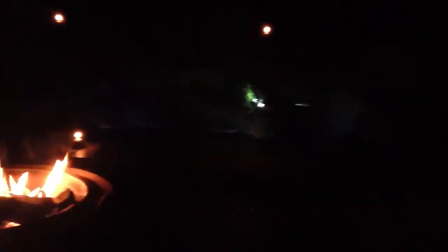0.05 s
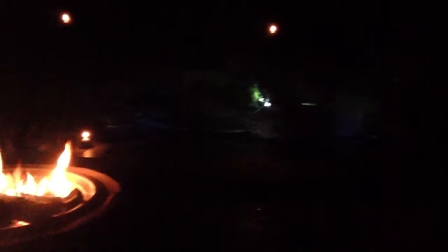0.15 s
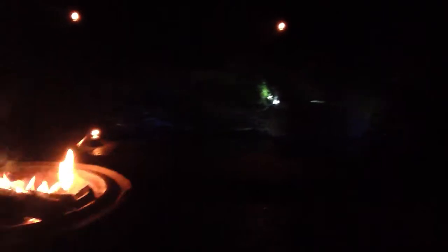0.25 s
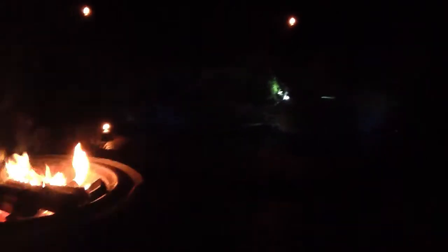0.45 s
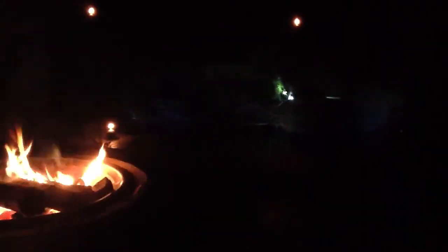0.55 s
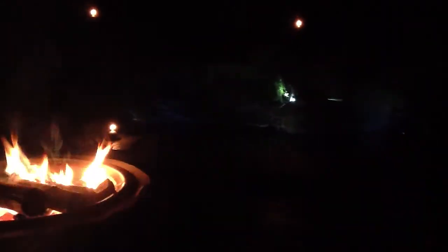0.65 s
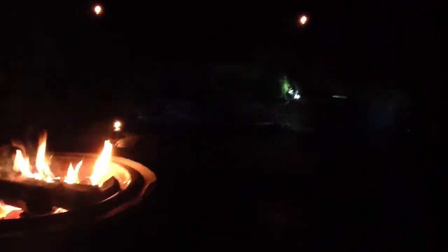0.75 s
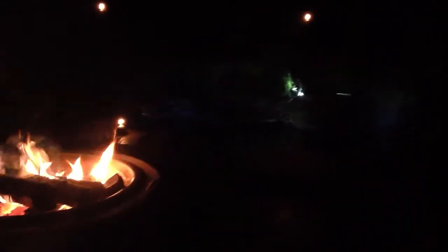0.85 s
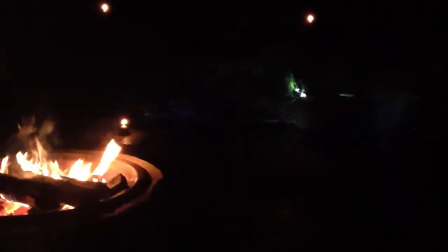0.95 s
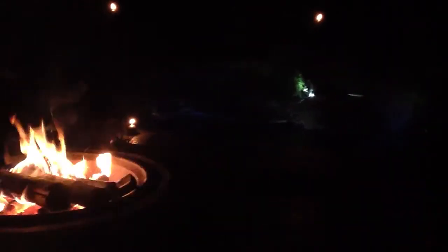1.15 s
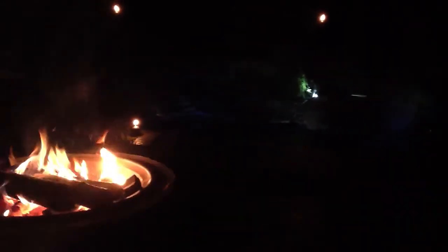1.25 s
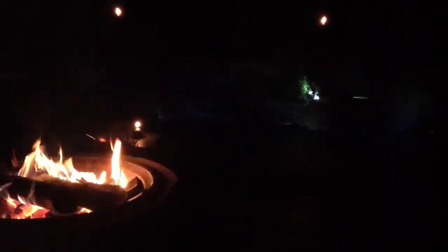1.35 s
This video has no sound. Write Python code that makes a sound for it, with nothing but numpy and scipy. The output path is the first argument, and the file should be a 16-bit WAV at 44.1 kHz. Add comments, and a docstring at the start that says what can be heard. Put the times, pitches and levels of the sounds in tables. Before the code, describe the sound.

Two tree frogs trill over each other at night, with distant frogs and faint fire crackle.

```python
"""Two tree frogs trill over each other at night, each a train of rising chirps that slows as it goes.
Farther off, a toad's pulses ring its throat into a buzz, other frogs croak low, and distant toads
and insects merge into pulsing bands of noise. A small fire ticks faintly and a distant motor hums
under a steady hiss. Ground and trees return short echoes."""
import sys
import numpy as np
from scipy import signal
from scipy.fft import rfft, irfft, next_fast_len
from scipy.io import wavfile
from scipy.ndimage import uniform_filter1d, map_coordinates

SR = 44100
rng = np.random.default_rng(int(sys.argv[2]) if len(sys.argv) > 2 else 0)


def wav_out(sig):
    """Save sig, one row per channel (or a flat mono array), as 16-bit PCM at SR to the path in sys.argv[1]."""
    wavfile.write(sys.argv[1], SR, np.round(np.clip(np.atleast_2d(sig).T, -1, 1) * 32767).astype(np.int16))


N = 61739
TIME = np.arange(N) / SR

def amp(db):
    """Decibels to amplitude ratio."""
    return 10 ** (np.asarray(db) / 20)

def unit(x):
    """Normalisation to rms 1."""
    return x / np.sqrt(np.mean(x ** 2) + 1e-20)

def along(points, hz):
    """Interpolation on a log frequency axis."""
    f, v = np.transpose(points)
    return np.interp(np.log(hz + 1), np.log(f + 1), v)

def read(rows, t):
    """Linear interpolation of each column at times t."""
    s, *cols = np.transpose(rows)
    return [np.interp(t, s, c) for c in cols]

def wobble(rate):
    """Smooth random modulation, rate knots a second."""
    knots = rng.standard_normal(int(N * rate / SR) + 4)
    return map_coordinates(knots, [TIME * rate])

def filtered(x, response):
    """Linear filtering: the spectrum times a frequency response."""
    m = next_fast_len(N + SR // 2)
    return irfft(rfft(x, m) * response(np.fft.rfftfreq(m, 1 / SR)), m)[:N]

def coloured(x, spectrum):
    """Spectral shaping by a table of gains."""
    return filtered(x, lambda hz: amp(along(spectrum, hz)))

def bell(u, rise, fall):
    """Gaussian with its own width on each side of u = 0."""
    return np.exp(-.5 * (u / np.where(u < 0, rise, fall)) ** 2)

# Motor partials. Each row: frequency in Hz, rms level in dB.
MOTOR_PARTIALS = [(112.2, -66), (157.1, -68.5), (201.9, -68), (246.7, -74)]
def motor():
    """Superposition: fixed sinusoids, each drifting in level, sum to a hum."""
    return sum(amp(db + 1.9 * wobble(5.6)) * np.sqrt(2) * np.sin(2 * np.pi * (hz * TIME + rng.random()))
               for hz, db in MOTOR_PARTIALS)

# Hiss spectrum. Each row: frequency in Hz, relative level in dB.
AIR_SPECTRUM = [(25, -23), (50, -23), (85, -11), (130, -3.5), (260, -1), (380, -10.5), (600, 8),
                (780, -2.5), (920, 3.5), (1150, 4), (1400, -3.5), (1800, 11), (2200, -3.5), (2450, 3.5),
                (2700, 2), (3400, 1), (4800, -1.5), (9000, -3.5), (15000, -6.5)]
def night_air(rms_db=-44.5, flicker_db=1.73, patchy_db=1.5):
    """Modulated noise: the hiss flickers in small patches of time and frequency."""
    noise = rng.standard_normal(N) * amp(flicker_db * wobble(450))
    cells = signal.stft(noise, nperseg=256)[2]
    patches = uniform_filter1d(rng.standard_normal(cells.shape), size=14, axis=0)
    patches = unit(uniform_filter1d(patches, size=6, axis=1))
    hiss = signal.istft(cells * amp(patchy_db * patches), nperseg=256)[1][:N]
    return amp(rms_db) * unit(coloured(hiss, AIR_SPECTRUM))

# The toad's trill. Each row: time in seconds, pulses per second, throat resonance in Hz, level in dB.
TOAD_TRILL = [(0, 110, 1580, -59), (.08, 120, 1770, -54), (.16, 124.5, 1920, -47.5),
              (.28, 127.6, 2003, -42), (.5, 125.7, 1956, -46.5), (.7, 123.4, 1960, -43.5),
              (.9, 121.4, 1910, -41), (1.15, 120.3, 1888, -45), (1.4, 119.2, 1895, -42.5)]
def toad(width_s=.002, rough_db=1.2):
    """Pulsed resonance: each pulse rings the throat briefly; the trill climbs, then sags."""
    rate, hz, db = read(TOAD_TRILL, TIME)
    from_peak_s = (np.cumsum(rate) / SR % 1 - .5) / rate
    rings = bell(from_peak_s, width_s, width_s) * np.cos(2 * np.pi * hz * from_peak_s)
    return amp(db + rough_db * wobble(70)) * unit(rings)

# Swell of the far toads. Each row: time in seconds, level in dB.
FAR_TOAD_LEVELS = [(0, -70), (.1, -66), (.2, -49.5), (.5, -53), (1.0, -48), (1.4, -50.5)]
def chorus(centre_hz, width_hz, pulse_hz, db):
    """Amplitude modulation: far callers merge into a noise band that pulses unevenly."""
    phase = 2 * np.pi * np.cumsum(pulse_hz * (1 + .0983 * wobble(15))) / SR
    gain = amp(db + wobble(5.7))
    band = filtered(rng.standard_normal(N), lambda hz: bell(hz - centre_hz, width_hz, width_hz))
    return gain * unit(band * (1 + np.cos(phase)))

# Far croaks. Each row: peak time in seconds, pitch in Hz, length in seconds, level in dB.
CROAK_NOTES = [(0.014, 616, 0.03, -45.5), (0.087, 660, 0.032, -44), (0.138, 560, 0.02, -44.5),
               (0.199, 629, 0.036, -50.5), (0.244, 610, 0.021, -44), (0.314, 625, 0.046, -45),
               (0.428, 645, 0.03, -41.5), (0.591, 530, 0.017, -42.5), (0.601, 596, 0.023, -48),
               (0.952, 467.4, .05, -57), (1.058, 627.5, 0.073, -45.5), (1.161, 530, 0.02, -47),
               (1.383, 604.7, 0.052, -45.5)]
def far_croaks(waver=.0274):
    """Frequency jitter roughens low notes whose overtones are lost to distance."""
    out = np.zeros(N)
    for s, hz, length, db in CROAK_NOTES:
        phase = 2 * np.pi * np.cumsum(hz * (1 + waver * wobble(200))) / SR
        out += amp(db) * bell(TIME - s, length / 4, length / 3) * np.sin(phase)
    return out

# Fire pops. Each row: start in seconds, level in dB before filtering.
FIRE_POPS = [(.038, -28.5), (0.059, -39), (.462, -27), (.54, -34), (.627, -27.5), (.632, -31),
             (0.913, -32.5), (.946, -30.5), (.973, -35), (1.226, -31)]
# Crackle filter. Each row: frequency in Hz, gain in dB.
FIRE_SPECTRUM = [(30, -50), (200, -16), (500, -2), (1500, 2), (3500, 10), (7000, 4), (15000, -0.5)]
def fire(tick_db=-39, scatter_db=4, decay_s=.0014):
    """Exponentially damped noise bursts: a few pops over a random patter of ticks."""
    ticks = [(a * N / SR, tick_db + scatter_db * (2 * b - 1)) for a, b in rng.random((110, 2))]
    out, t = np.zeros(N + SR), TIME[:SR // 50]
    for s, db in FIRE_POPS + ticks:
        out[int(s * SR):][:len(t)] += amp(db) * np.exp(-t / decay_s) * rng.standard_normal(len(t)) / 2
    return coloured(out[:N], FIRE_SPECTRUM)

# Chirp timing. Each gives, in seconds: start, first gap, slowing per chirp squared, last chirp's lag.
FIRST_RHYTHM = (.1917, .02385, .000016, 0)
SECOND_RHYTHM = (.3665, .0263, .000028, .003)
# Vocal effort. Each row: time in seconds, level in dB, pitch in Hz, octave over fundamental in dB.
FIRST_VOICE = [(0.188, -31, 1139, -8.5), (0.218, -27.5, 1183, 6.5), (.26, -27.5, 1178, 9),
               (.41, -29.5, 1201, 12), (.6, -25, 1190, 8.5), (.8, -35.5, 1193, 21), (.95, -26, 1199, 10.5)]
SECOND_VOICE = [(0.367, -27, 1155, 4.8), (0.401, -30.5, 1170, 11.4), (0.649, -27.5, 1178, 9.5),
                (.93, -28, 1199, 10.4), (1.07, -27.5, 1195, 10.5), (1.183, -30, 1180, 11.6)]
# Envelope of the fundamental. Each gives, in seconds: lag, rise, fall.
FIRST_ENVELOPE = (0.00026, 0.0022, 0.0025)
SECOND_ENVELOPE = (.003, .0046, .0017)
# Louder moments where the two frogs' chirps coincide. Each row: time in seconds, extra level in dB.
CHIRP_OVERLAPS = [(.36, 0.5), (.553, 3), (.578, 2), (.822, 1.5)]
def tree_frog(rhythm, voice, envelope, count, rise_s, fall_s, sweep_hz_per_s, third_db, sharp_hz=9):
    """Resonance of the vocal sac favours the octave over the fundamental in each rising chirp."""
    start, gap, slowing, last_lag = rhythm
    lag, rise, fall = envelope
    out, k = np.zeros(N), np.arange(count)
    for s in start + gap * k + slowing * k ** 2 + last_lag * (k == count - 1):
        db, hz, octave_db = read(voice, s)
        db += sum(extra for when, extra in CHIRP_OVERLAPS if abs(when - s) < .005)
        span = abs(TIME - s) < .02
        u = TIME[span] - s
        detune, low_db, scatter = rng.standard_normal(3)
        pitch = hz * (1 + .0028 * detune) + sweep_hz_per_s * np.clip(u, -.005, .007)
        phase = 2 * np.pi * (np.cumsum(pitch) / SR + rng.random())
        fundamental = amp(low_db) * bell(u - lag, rise, fall) * np.sin(phase + 2 * np.pi * sharp_hz * u)
        overtones = bell(u, rise_s, fall_s) * (np.sin(2 * phase) + amp(third_db) * np.sin(3 * phase))
        out[span] += amp(db + .5 * scatter) * (fundamental + amp(octave_db) * overtones)
    return out

# Rasp spectrum. Each row: frequency in Hz, relative level in dB.
RASP_SPECTRUM = [(600, -45), (950, 1), (1450, 10.5), (1800, -4), (2800, 2.5), (3200, 1.5), (5000, -13),
                 (9000, -32)]
def rasp(chirps, db=-23):
    """Envelope modulation: noise follows the running rms of the chirps."""
    envelope = np.sqrt(abs(uniform_filter1d(chirps ** 2, size=200)))
    return amp(db) * unit(coloured(rng.standard_normal(N), RASP_SPECTRUM)) * envelope

def ground_echo(x, delay_s, db):
    """A single reflection returns a weak delayed copy."""
    return amp(db) * filtered(x, lambda hz: np.exp(-2j * np.pi * hz * delay_s))

# Decay among the trees. Each row: frequency in Hz, time to fall 60 dB in seconds.
TREE_DECAY = [(500, 0.2), (1200, 0.27), (2400, 0.33), (6000, 0.28)]
def trees(x):
    """Diffuse reflection: convolution with a noise tail that lasts longest near 2400 Hz."""
    hz, t, cells = signal.stft(rng.standard_normal(SR // 2), SR, nperseg=256)
    decay = amp(-60 * t / along(TREE_DECAY, hz)[:, None])
    tail = signal.istft(cells * decay, SR, nperseg=256)[1]
    tail /= np.sqrt(np.mean(abs(rfft(tail, SR)[1000:2600]) ** 2))  # unit gain over 1000-2600 Hz
    return signal.fftconvolve(x, tail)[:N]

def scene():
    """Superposition of callers, echoes, fire, motor and air in one channel."""
    first = tree_frog(FIRST_RHYTHM, FIRST_VOICE, FIRST_ENVELOPE, count=32,
                      rise_s=.0018, fall_s=.0018, sweep_hz_per_s=17110, third_db=-26)
    second = tree_frog(SECOND_RHYTHM, SECOND_VOICE, SECOND_ENVELOPE, count=31,
                       rise_s=.0029, fall_s=.0031, sweep_hz_per_s=19640, third_db=-23.5)
    echoes = ground_echo(first, delay_s=.0105, db=-16) + ground_echo(second, delay_s=.01, db=-12)
    chirps = first + second + echoes
    near = chirps + rasp(chirps)
    croaks = far_croaks()
    far_toads = chorus(centre_hz=1994, width_hz=55, pulse_hz=98, db=read(FAR_TOAD_LEVELS, TIME)[0])
    insects = chorus(centre_hz=4415, width_hz=70, pulse_hz=55, db=-58)
    far = toad() + croaks + far_toads + insects
    reverberation = amp(-9.5) * trees(chirps) + amp(-4.5) * trees(croaks)
    return (near + far + reverberation + fire() + motor() + night_air())[None]

def record(dry):
    """An ideal low-pass filter removes everything above 15500 Hz."""
    return filtered(dry[0], lambda hz: hz < 15500)[None]

dry = scene()
out = record(dry)
wav_out(out)
```